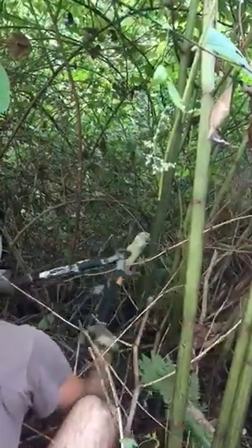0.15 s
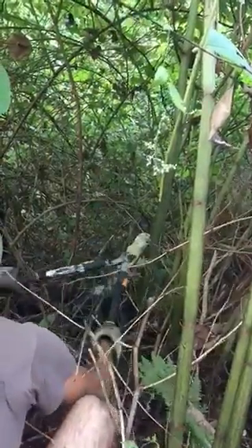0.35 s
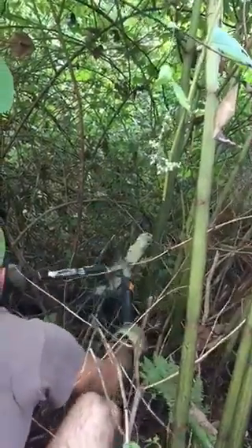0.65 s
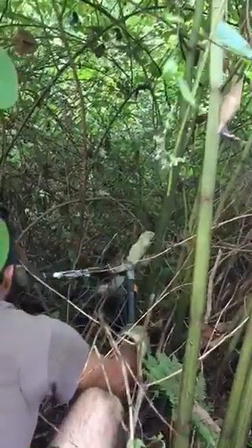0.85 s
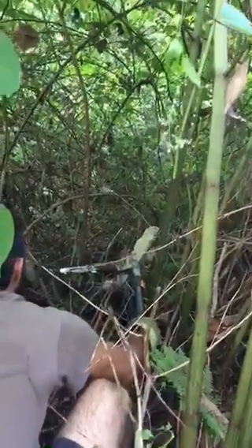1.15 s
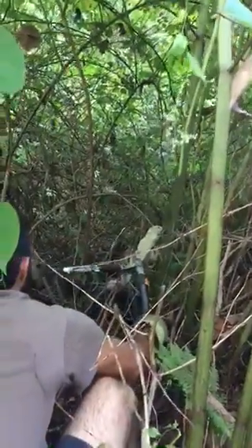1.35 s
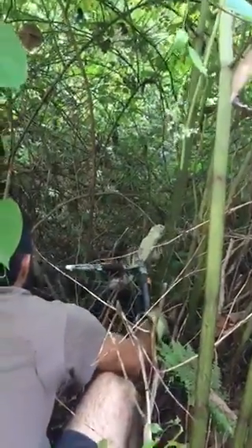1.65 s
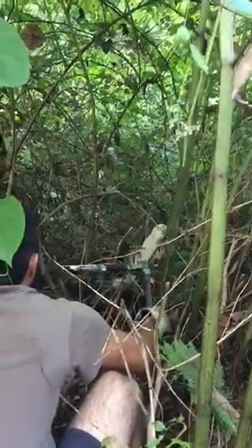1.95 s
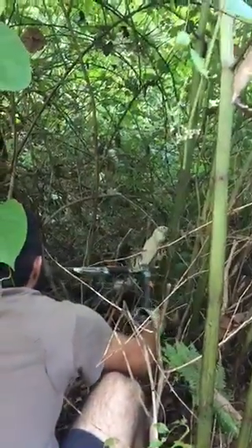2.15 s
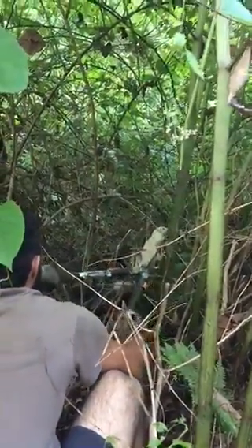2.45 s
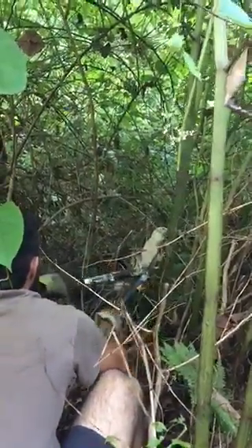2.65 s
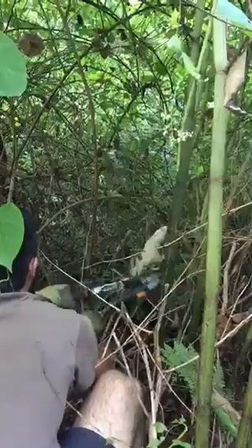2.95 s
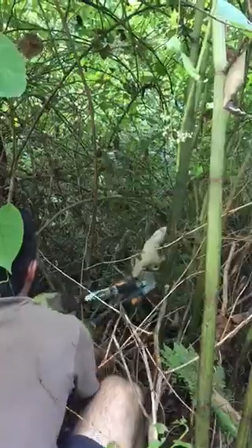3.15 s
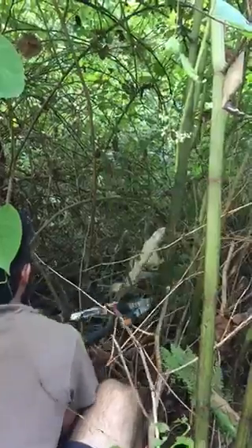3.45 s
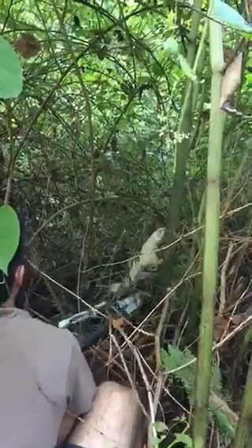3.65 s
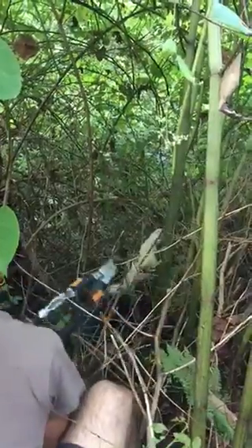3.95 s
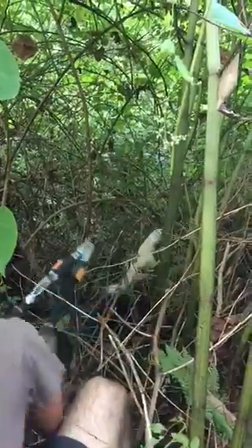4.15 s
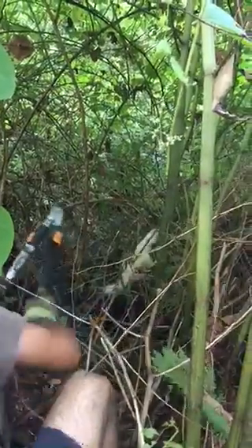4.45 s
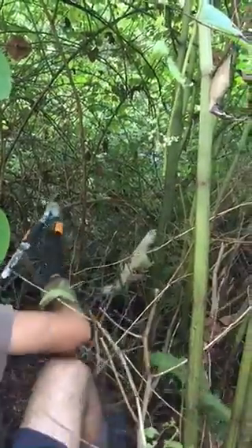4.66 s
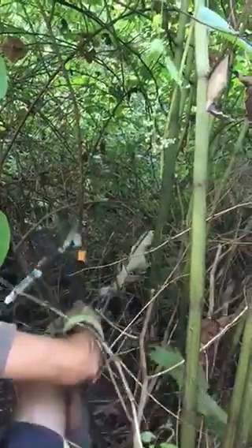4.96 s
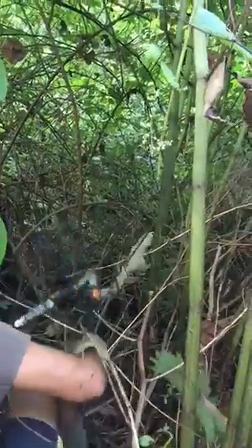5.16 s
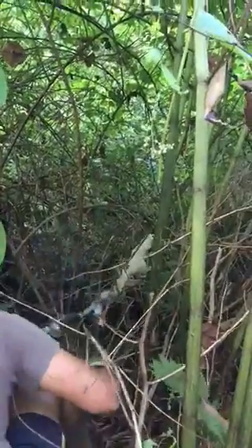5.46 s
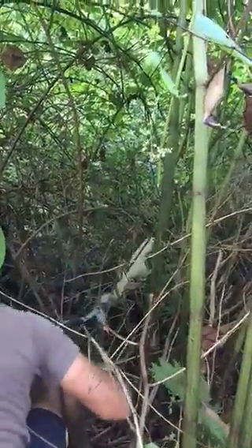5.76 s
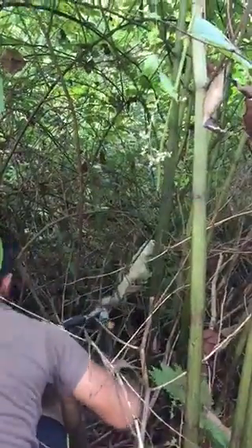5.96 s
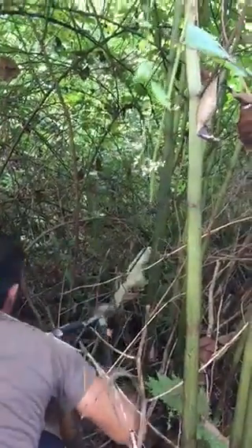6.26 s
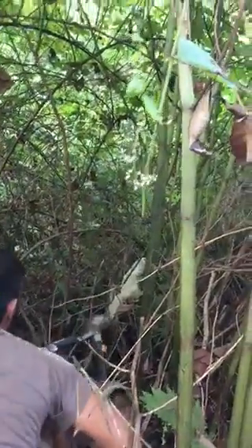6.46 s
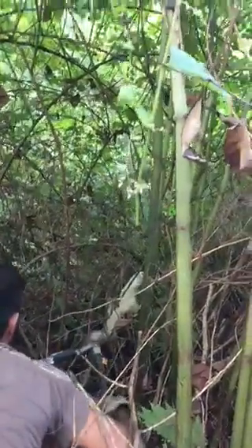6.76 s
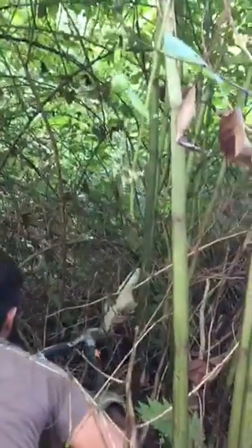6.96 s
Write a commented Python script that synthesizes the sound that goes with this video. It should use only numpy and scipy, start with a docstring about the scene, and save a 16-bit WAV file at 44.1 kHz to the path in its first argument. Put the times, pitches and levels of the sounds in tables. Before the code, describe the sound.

Outdoors in a thicket, hand shears give a small cluster of bright metallic clicks within the first second. After a quiet pause, caught stems are tugged: dry cracks, woody knocks and dull ground bumps build to one very sharp snap. A second, lighter bout of rustling and brittle ticking follows, thinning to stray snaps. Close, nearly dry microphone, with faint air, a fading far-off rush and a low drone.

```python
"""In a thicket, someone cuts dry thorny stems with hand pruning shears.
Steel blades click as ringing resonances, stems crack and snap as short fractures that ring the canes,
and twigs knock at their own pitches. Pulls on caught stems gate random crackle, ticks and soft thumps.
The canes scatter each click into a short noise tail; filtered noise makes the air, a far-off rush
that fades and a low drone behind."""
import sys
import numpy as np
from scipy import signal
from scipy.fft import rfft, irfft
from scipy.io import wavfile
from scipy.ndimage import uniform_filter1d

SR = 44100
rng = np.random.default_rng(int(sys.argv[2]) if len(sys.argv) > 2 else 0)


def waveform_to_disk(signal):
    """Save audio, clipped to [-1, 1], as 16-bit WAV at the path in sys.argv[1]."""
    frames = np.transpose(np.atleast_2d(signal))
    scaled = np.clip(frames, -1, 1) * 32767
    samples = np.round(scaled).astype(np.int16)
    wavfile.write(sys.argv[1], SR, samples)


N = 313551  # length in samples
TIME = np.arange(N) / SR  # seconds
AGE = np.arange(16384) / SR  # seconds since the start of a burst

# Spectrum of the outdoor air. Each row: frequency in Hz, relative level in dB.
AIR_COLOUR = [(76, -34.5), (130, -2), (267, -3.5), (361, -2), (507, -6.5), (698, -5.5), (803, -10.5),
              (905, -5), (1860, -8.5), (2720, -11.5), (3010, -12.5), (5480, -15.5), (15500, -28.5)]
# Resonances of the low drone. Each row: frequency in Hz, width in Hz, gain in dB.
DRONE_MODES = [(44, 9, -2.5), (62, 12, 3), (71, 8.1, 4.5), (82.3, 22, -2.5), (112, 10, -12.5)]
# Colour laid over those resonances. Each row: frequency in Hz, gain in dB.
DRONE_COLOUR = [(22, -31.0), (42, 2.5), (110, 1), (260, -23.5)]
# Slow level of the drone, before its waver. Each row: time in seconds, level in dB.
DRONE_FADER = [(0, -61.5), (.5, -64), (1.2, -68), (2.9, -63), (3.7, -66.5), (5.5, -64.5), (7.1, -67)]
# Colour of leaves touching cloth. Each row: frequency in Hz, gain in dB.
LEAF_COLOUR = [(600, -32), (2200, 6), (4500, -1.5), (8500, -8.5), (10300, -7), (12000, -6.5), (15500, -9.0)]
# Colour of stems scraping through the brush. Each row: frequency in Hz, relative level in dB.
SCRAPE_COLOUR = [(130, -23.5), (200, -12), (450, -10.5), (630, -4.5), (1150, -10.5), (1600, -2.5),
                 (2200, 0.5), (3400, 0), (4600, -1), (6600, -3.5), (8600, -2), (11700, -1.5),
                 (15500, -11.5)]
# Colour of the twigs flicked in the brush. Each row: frequency in Hz, gain in dB.
FLICK_COLOUR = [(1600, -1.5), (2600, 0.51), (5000, 1.0), (12000, 1.0)]
# Pulls on stems caught in the brush. Each row: start in seconds, length in seconds, level in dB,
# hiss (the treble of the rustle) in dB, thump in dB relative to the level.
STEM_PULLS = [(0.157, 0.25, -72, -3, -19), (2.71, 0.12, -57, 3.5, -24), (2.853, 0.14, -50.5, -7, -11),
              (3.087, 0.18, -48.5, -10, -18), (3.765, 0.16, -69.5, -10, -22.5),
              (4.47, 0.18, -52.5, -1, -12.5), (4.634, 0.14, -45.5, -2, -13.5),
              (4.774, 0.14, -52.5, 1.5, -12), (4.904, .38, -61.5, 1.5, -25),
              (5.094, 0.055, -54.5, 4.5, -20), (5.283, 0.23, -57, 3, -12.5), (5.542, 0.21, -59, 5, -17),
              (5.779, 0.1, -60, 2, -15.5)]
# Dull resonances of stems bumping the ground. Each row: frequency in Hz, width in Hz, gain in dB.
GROUND_MODES = [(196, 130, -1), (600, 190, -3.5)]
# Knocks of stem on stem. Each row: start in seconds, ring in Hz, level in dB,
# hardness in dB, which lifts both the overtone and the tick of bark.
STEM_KNOCKS = [(0.9635, 3250, -28.5, -33), (2.178, 703, -35.5, -16), (2.396, 3700, -33.5, -13),
               (2.5897, 3310, -24, -22.5), (2.593, 2270, -26.5, -20), (2.8403, 1570, -11, -23),
               (2.8435, 1110, -18.5, -26), (2.846, 2060, -14, -28), (2.864, 1790, -17.5, -25),
               (2.92, 2160, -22.5, -24), (2.996, 4170, -17.5, -22), (3.077, 1860, -22.5, -26),
               (3.144, 657, -27, -30), (3.212, 614, -22, -19), (3.368, 3080, -7.5, -37),
               (3.369, 1920, -12.5, -32.5), (3.5753, 1710, -29.5, -22), (3.595, 3550, -33, -26.5),
               (3.7081, 2680, -36.5, -33), (3.9463, 4860, -31.5, -21), (4.0428, 4090, -32.5, -27.5),
               (4.397, 4550, -34.5, -24), (4.544, 2240, -28.5, -31), (4.617, 1680, -27, -27),
               (5.11, 2390, -25, -25), (5.502, 3550, -24, -29), (5.5788, 5600, -29, -16.5),
               (5.629, 2250, -24, -26), (5.631, 3320, -23, -33), (6.02, 457, -35, -15),
               (6.158, 5840, -30.5, -20), (6.2913, 2200, -30.5, -42.5), (7.103, 3350, -32.5, -10.5)]
# Cracking stems, thin ones bright and thick ones dull. Each row: start in seconds, gain in dB,
# tilt in dB per octave, scatter from the canes in dB.
STEM_CRACKS = [(1.1267, -32, 1.5, 2), (2.177, -35.5, 4, 1.5), (2.711, -21.5, -1, 0), (2.8422, -6.5, -4, 3),
               (2.8745, -4, 1, -6), (2.9346, -11.5, -3, -8), (2.9606, 1.5, 0, 2), (3.133, -12, -4.5, 6.5),
               (3.1423, -9, -5.5, 1.5), (3.1655, -6.5, -4.5, -10), (3.2109, 5, -0.5, -1),
               (3.2259, -3.5, -3.5, -3.5), (3.3663, 12, 1.7, -5), (4.617, -17, 1.5, -13),
               (4.666, -5, 0.5, -1), (4.7593, -12.5, -0.5, -3), (4.826, -14.5, 1, 3),
               (5.0176, -22.5, 9.5, -7), (5.0947, -19, -3, 3), (5.165, -10.5, 0, -0.5),
               (5.1942, -12.5, -1.5, -22), (5.2989, -11, -2.5, -6.5), (5.4055, -13.5, 5.5, 2.5),
               (5.4331, -18.5, -1, 1), (5.716, -23, 3.5, 4), (5.743, -19.5, 2.5, 2), (5.833, -17, 2.5, -7),
               (5.8445, -19.5, 3.5, -11), (5.877, -19, -0.5, 2), (5.974, -23.5, -5, -6),
               (6.02, -32, 2.5, -8.5), (6.831, -16, 1, -5)]
# Colour shared by all cracks, before the tilt. Each row: frequency in Hz, gain in dB.
SNAP_COLOUR = [(800, -13.5), (2700, -0.5), (7200, -0.5), (13000, -3)]
# Resonances of the woody canes. Each row: frequency in Hz, width in Hz, gain in dB.
CANE_MODES = [(630, 53, -2.5), (1000, 56, 0.5), (1897, 50, -11.5), (3400, 370, -11), (6000, 210, -4),
              (6720, 120, 3.5), (7120, 300, -8.5), (9140, 1200, 1), (11750, 840, -1)]
# Clicks of the blades and the catch. Each row: start in seconds, gain in dB, brightness in dB,
# rise time constant of the contact in seconds.
SHEAR_CLICKS = [(0.5045, -17.5, 3, 0.0014), (0.5143, -21.5, 6, 0.0009), (0.588, -6.5, 2.5, 0.00058),
                (0.8152, -9, -33, 0.00078), (.841, -15.5, -17.5, 0.0037), (0.909, -17, -5, 0.0015),
                (0.96, -20.5, -13, 0.0021), (0.978, -30, 2, 0.0015)]
# Resonances of the shears, before each click shifts them. Each row: frequency in Hz, width in Hz, gain in dB.
STEEL_MODES = [(1880, 66, 18), (2090, 59, -6), (2480, 100, 0.5), (3260, 180, 1.5), (3580, 390, -0.5),
               (4600, 270, 4.5), (5600, 400, 2), (6660, 230, 6), (7800, 450, 1), (8830, 530, 2),
               (10150, 570, -1.5), (11300, 260, 3), (12700, 650, -1), (14900, 700, -16)]
# Colour of the dry bite. Each row: frequency in Hz, gain in dB.
BITE_COLOUR = [(2000, -8), (4500, 4.0), (15000, -17)]

AIR_DB = -67  # before its slow drift
RUSH_DB, RUSH_FADE_DB_PER_S = -65.5, 2  # level at the start, and how fast it sinks
LEAVES_DB, SHAKEN_DB = -77, -17  # leaves at rest; their share of a pull
SWAY_S = 0.35  # time constant of the leaves following a pull
PULL_ATTACK_S, PULL_RELEASE_S = 0.085, 0.024  # length of the rise; time constant of the decay
TILT_PIVOT_HZ = 4000  # where the tilt of a crack leaves the level alone
TOP_HZ = 15900  # cut of the recorder


def undb(db):
    """Turn decibels into gain."""
    return 10 ** (np.asarray(db) / 20)


def unit(x):
    """Scale to rms 1."""
    return x / np.sqrt(np.mean(x ** 2))


def unit_energy(x):
    """Scale to energy 1."""
    return x / np.sqrt(np.sum(x ** 2))


def curve(rows):
    """Draw a gain over time from rows of seconds and dB."""
    return undb(np.interp(TIME, *np.transpose(rows)))


def add(out, s, x):
    """Mix x into out from s seconds on."""
    i = max(int(s * SR), 0)
    out[i:i + len(x)] += x[:max(N - i, 0)]


def colour(x, points):
    """Equalise through points of Hz and dB with a causal, minimum-phase filter."""
    hz, db = np.transpose(points)
    f = np.maximum(np.fft.rfftfreq(len(x), 1 / SR), 1)
    log_gain = np.log(undb(np.interp(np.log(f), np.log(hz), db)))
    # folding the cepstrum onto positive times keeps the filter from sounding early
    cepstrum = irfft(log_gain, len(x))
    cepstrum[1:] *= 2
    cepstrum[len(x) // 2:] = 0
    return irfft(rfft(x) * np.exp(rfft(cepstrum)), len(x))


def ring(x, modes):
    """Excite parallel resonances, each given as Hz, width in Hz and dB."""
    return sum(undb(db) * signal.lfilter(*signal.iirpeak(hz, hz / width, SR), x) for hz, width, db in modes)


def highpass(x, hz, order=2):
    """Weaken what lies below hz."""
    return signal.sosfilt(signal.butter(order, hz, "high", fs=SR, output="sos"), x)


def walk(rate):
    """Drift smoothly at random with an rms of 1, taking about rate new values a second."""
    k = int(SR / rate)
    steps = np.repeat(rng.standard_normal(N // k + 1), k)
    return unit(uniform_filter1d(uniform_filter1d(steps, k), k)[:N])


def swell(rise_s, decay_s):
    """Envelope of a burst: a quick rise times an exponential decay."""
    return (1 - np.exp(-(AGE / rise_s) ** 2)) * np.exp(-AGE / decay_s)


def burst(rise_s, decay_s):
    """Dying noise of energy 1."""
    return unit_energy(rng.standard_normal(len(AGE)) * swell(rise_s, decay_s))


def fracture(rise_s, decay_s, count=4):
    """A quick run of tiny breaks that holds all pitches about equally."""
    x = burst(rise_s, decay_s)
    envelope = swell(rise_s, decay_s)
    for _ in range(count):
        flat = irfft(np.exp(1j * np.angle(rfft(x))))  # keep the phases, level the spectrum
        x = flat * np.sqrt(envelope)
    return unit_energy(x)


def thicket(scatter_db):
    """Sound thrown back by the near canes, then more faintly and for longer by the far ones."""
    near, far = burst(0.0018, 0.01), burst(0.0027, 0.032)
    return undb(scatter_db) * (near + undb(-10.0) * far)


def crackle(rate, spread_db, scatter_db):
    """Countless tiny catches of thorn and dry leaf, mostly weak and a few strong, in three shapes."""
    out = 0
    for _ in range(3):
        size = undb(spread_db * np.minimum(rng.exponential(size=N), 4))
        grains = (rng.random(N) < rate / SR) * rng.choice([-1, 1], N) * size
        catch = fracture(0.0001, 0.00085) + thicket(scatter_db)
        out = out + signal.fftconvolve(grains, catch)[:N]
    return unit(out)


def twigs(rate, spread_db, width):
    """Small twigs tick at random, each size ringing with its own pair of pitches."""
    out = 0
    blow = fracture(0.0001, 0.00077) + thicket(0)
    count = int(rate * N / SR / 20)  # ticks for each of the 20 sizes
    for hz in np.geomspace(1500, 9000, num=20):
        ticks = np.zeros(N)
        ticks[rng.integers(0, N, count)] = undb(spread_db * np.minimum(rng.exponential(size=count), 3))
        pair = [(hz, width * np.sqrt(hz / 4000), 0), (1.7 * hz, 2 * width, -4)]
        out = out + ring(ticks, pair) + 0.12 * ticks
    return unit(signal.fftconvolve(highpass(out, 1200), blow)[:N])


def pull(start, length):
    """One pull takes hold gradually, drags on and dies away."""
    age = TIME - start
    hold = np.sin(np.pi / 2 * np.clip(age / PULL_ATTACK_S, 0, 1)) ** 2
    return hold * np.exp(-np.maximum(age - length, 0) / PULL_RELEASE_S)


def air():
    """Outdoor air: coloured noise whose level drifts slightly."""
    return unit(colour(rng.standard_normal(N), AIR_COLOUR)) * undb(AIR_DB + 1.2 * walk(1.4))


def rush():
    """A far-off rush: noise through three broad resonances, wavering as it fades."""
    noise = unit(ring(rng.standard_normal(N), [(716, 260, -1.5), (896, 140, -3.5), (340, 140, -4.5)]))
    return noise * undb(RUSH_DB - RUSH_FADE_DB_PER_S * TIME + 1.9 * walk(13))


def drone(waver_db=2.0):
    """A low drone: noise through low resonances, riding a slow fader with a random waver."""
    hum = colour(ring(rng.standard_normal(N), DRONE_MODES), DRONE_COLOUR)
    return unit(hum) * curve(DRONE_FADER) * undb(waver_db * walk(9))


def leaves(twig_db=-2):
    """Leaves and thin twigs brush against sleeves and gloves, and sway on after each pull."""
    touch = unit(colour(crackle(300, 4.5, -3), LEAF_COLOUR))
    ticks = twigs(90, 3.5, 600)
    effort = sum(undb(db) * pull(s, length) for s, length, db, *_ in STEM_PULLS)
    # a one-pole smoother lets the leaves lag behind the pull
    step = 1 / (SWAY_S * SR)
    sway = signal.lfilter([step], [1, step - 1], effort)
    level = undb(LEAVES_DB) + undb(SHAKEN_DB) * sway
    return (touch + undb(twig_db) * ticks) * level * undb(2 * walk(22))


def brush(scrape_db=-1, twig_db=-1):
    """Stems scrape through dry leaves in uneven pulls, flicking twigs as they go."""
    scrape = unit(colour(crackle(350, 4.5, -7), SCRAPE_COLOUR))
    flicks = unit(colour(twigs(170, 5.4, 220), FLICK_COLOUR))
    rustle = undb(scrape_db) * scrape + undb(twig_db) * flicks
    rustle = rustle * undb(2.5 + 0.91 * walk(45))
    # zero-phase split, so each pull can set its own treble
    hiss = signal.sosfiltfilt(signal.butter(2, 6500, "high", fs=SR, output="sos"), rustle)
    out = np.zeros(N)
    for s, length, db, hiss_db, _ in STEM_PULLS:
        out += undb(db) * pull(s, length) * (rustle - hiss + undb(hiss_db) * hiss)
    return out


def thumps(rate=65):
    """While a stem is pulled, it bumps softly against the ground at random moments."""
    bumps = (rng.random(N) < rate / SR) * rng.standard_normal(N)
    blows = signal.fftconvolve(bumps, fracture(0.0025, 0.011))[:N]
    thud = np.zeros(N)
    for hz, width, db in GROUND_MODES:
        mode = [(hz, width, 0)]
        thud += undb(db) * ring(ring(blows, mode), mode)  # twice through for steeper sides
    weight = sum(undb(db + thump_db) * pull(s, length) for s, length, db, _, thump_db in STEM_PULLS)
    return unit(thud) * weight


def knocks(width=0.09, overtone_db=12):
    """A stem rings at its own pitch; a harder touch adds more overtone and more tick of bark."""
    out = np.zeros(N)
    for s, hz, db, hard_db in STEM_KNOCKS:
        blow = fracture(0.00059, 0.0027) + thicket(-3.5)
        body = ring(ring(blow, [(hz, width * hz, 0)]), [(hz, 0.25 * hz, 0)])
        overtone = ring(blow, [(1.7 * hz, width * hz, overtone_db + hard_db)])
        tick = undb(hard_db + 18.0) * highpass(blow, hz)
        add(out, s, undb(db) * (unit_energy(body + overtone) + tick))
    return out


def cracks():
    """Fibres part within a few milliseconds and ring the cane, each stem at its own pitches."""
    out = np.zeros(N)
    for s, db, tilt_db, scatter_db in STEM_CRACKS:
        snap = fracture(0.00037, 0.003) + thicket(scatter_db)
        pitches = np.geomspace(1200, 14000, num=7) * np.exp(rng.uniform(-0.19, 0.19, size=7))
        own = [(hz, 0.04 * hz, 0) for hz in pitches]
        wood = 0.5 * snap + 0.65 * ring(snap, CANE_MODES) + 0.7 * ring(snap, own)
        wood = highpass(wood, 560, order=3)
        tilted = [(hz, snap_db + tilt_db * np.log2(hz / TILT_PIVOT_HZ)) for hz, snap_db in SNAP_COLOUR]
        add(out, s, undb(db) * colour(wood, tilted))
    return out


def shears(wander=0.0068, crunch=0.62, scatter_db=-2):
    """The blades bite with a dry crunch and ring briefly; the grip changes the ring of each click."""
    out = np.zeros(N)
    for s, db, bright_db, contact_s in SHEAR_CLICKS:
        modes = []
        for hz, width, mode_db in STEEL_MODES:
            detune, lift = rng.standard_normal(2)
            modes.append((hz * (1 + wander * detune), width, mode_db + 1.4 * lift))
        steel = ring(fracture(contact_s, 0.0023) + thicket(scatter_db), modes)
        bite = crunch * colour(fracture(contact_s, 0.0014) + thicket(scatter_db), BITE_COLOUR)
        click = highpass(steel + bite, 2280, order=6)
        add(out, s, undb(db) * colour(click, [(2100, 0), (3300, bright_db)]))
    return out


def scene():
    """All sources summed at one microphone."""
    behind = air() + rush() + drone()
    stems = leaves() + brush() + thumps() + knocks() + cracks()
    return (behind + stems + shears())[None]


def record(dry):
    """The microphone colours the treble; the recorder rounds loud peaks and cuts the top."""
    dips = ring(dry, [(10350, 550, -8.5), (4900, 490, -10.5)])
    lift = ring(dry, [(5320, 450, -12.0)])
    heard = dry - dips + lift
    rounded = np.tanh(0.9 * heard) / 0.9
    return signal.sosfilt(signal.ellip(8, 0.2, 70, TOP_HZ, fs=SR, output="sos"), rounded)


dry = scene()
out = record(dry)
waveform_to_disk(out)
```